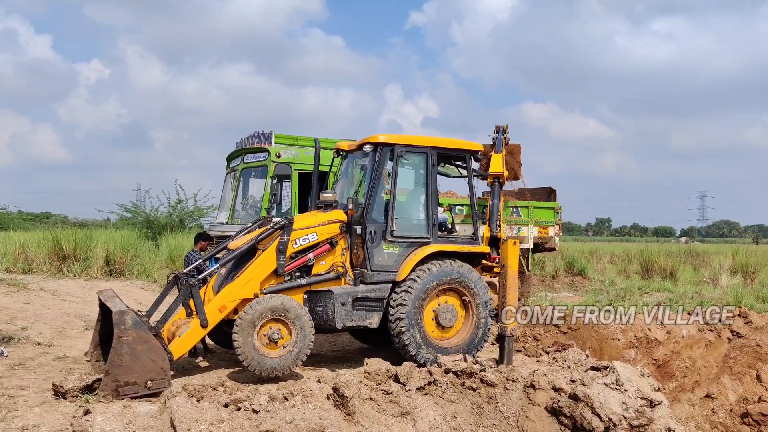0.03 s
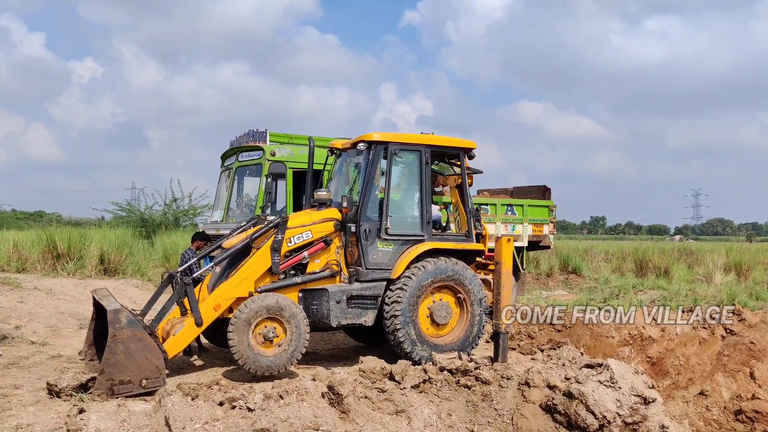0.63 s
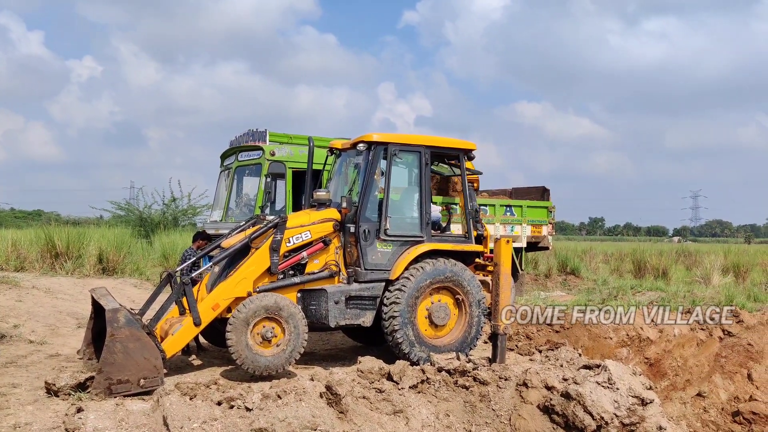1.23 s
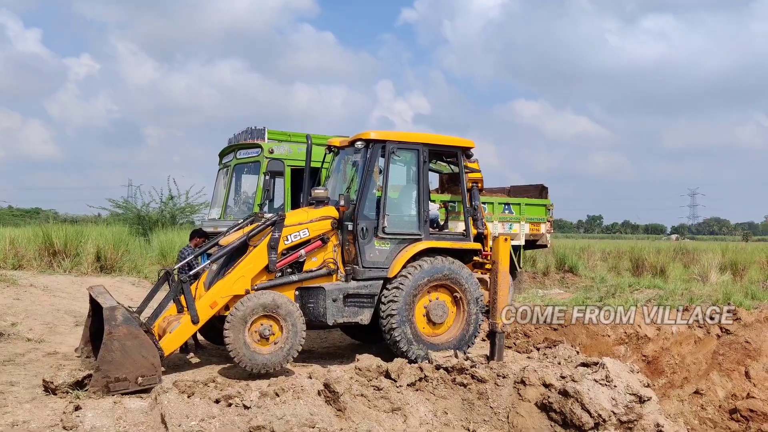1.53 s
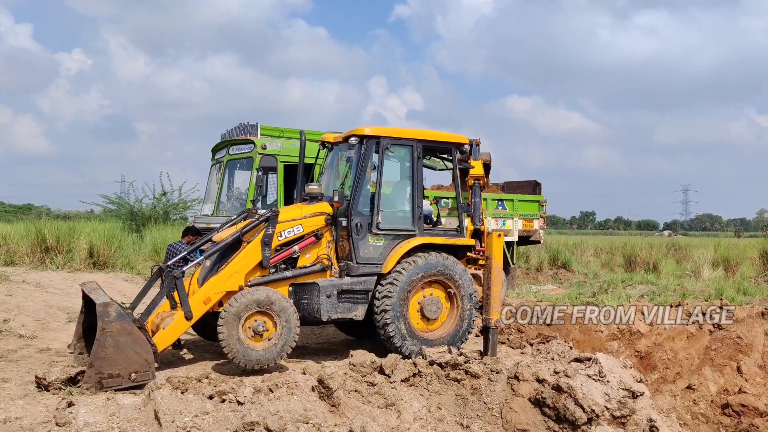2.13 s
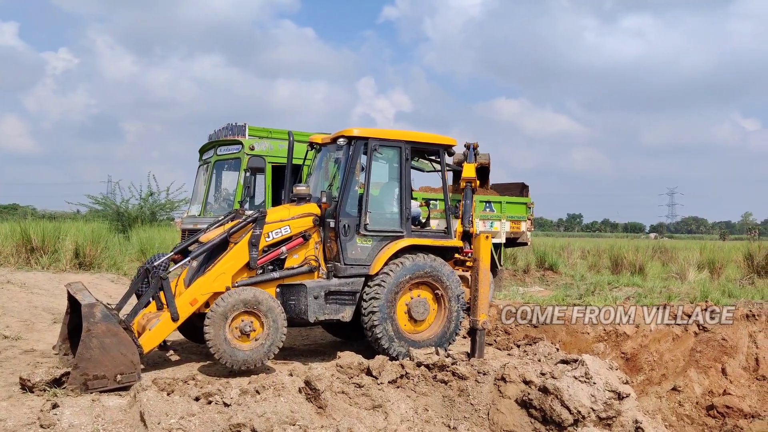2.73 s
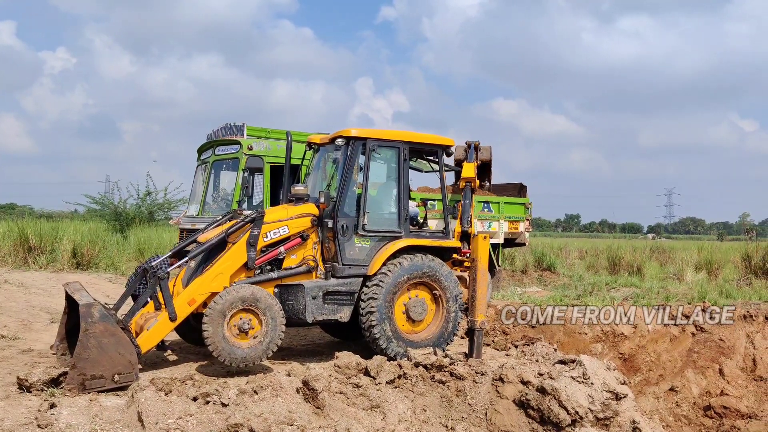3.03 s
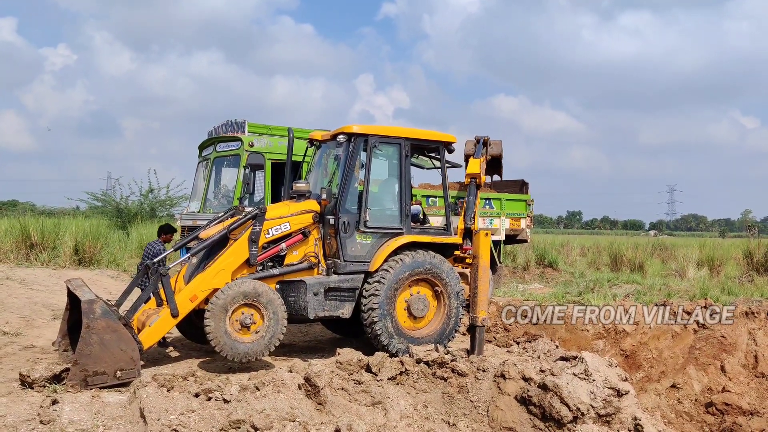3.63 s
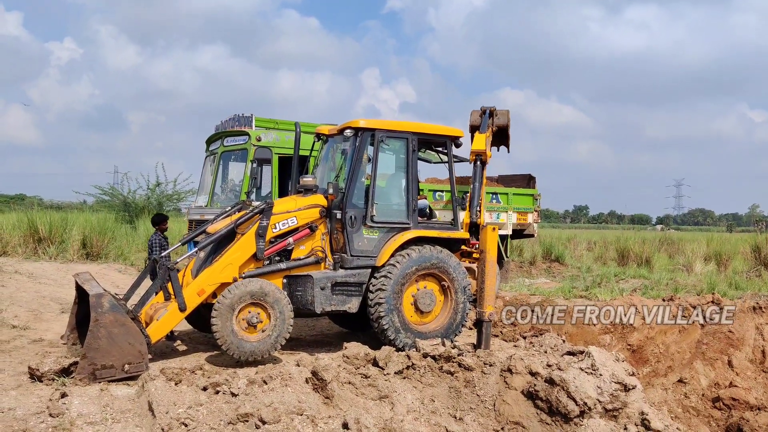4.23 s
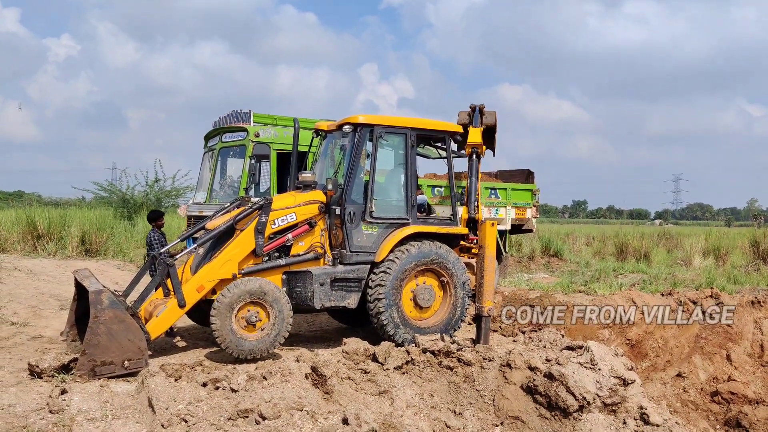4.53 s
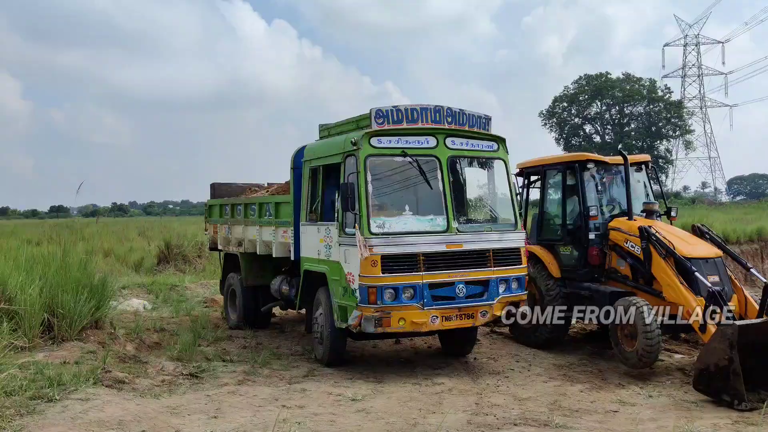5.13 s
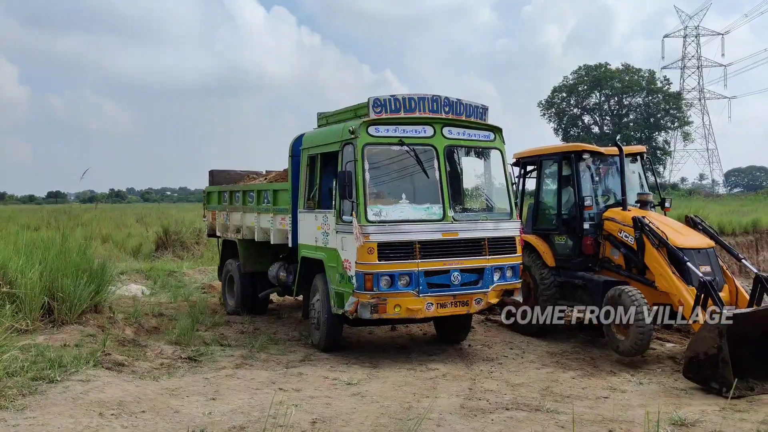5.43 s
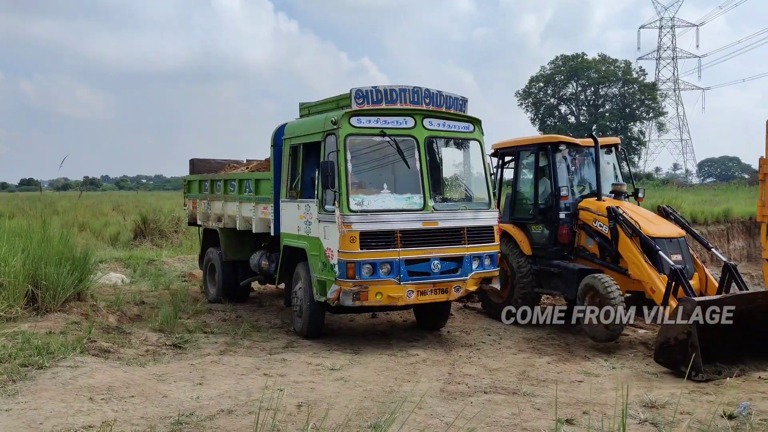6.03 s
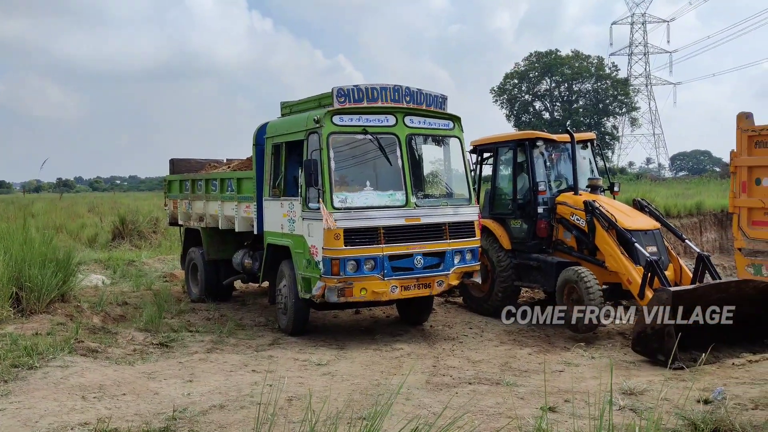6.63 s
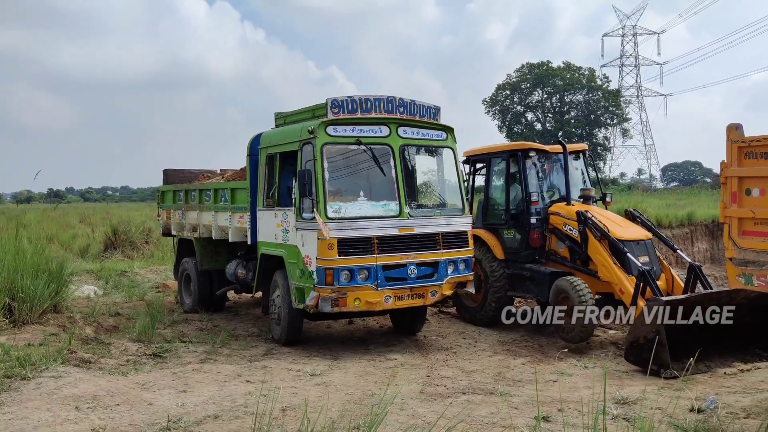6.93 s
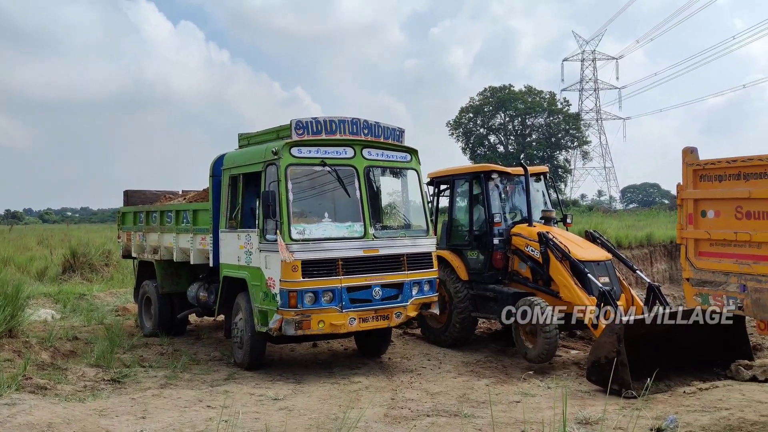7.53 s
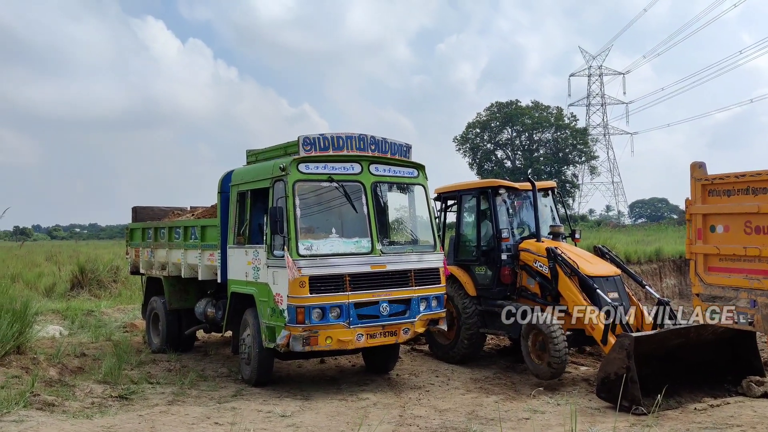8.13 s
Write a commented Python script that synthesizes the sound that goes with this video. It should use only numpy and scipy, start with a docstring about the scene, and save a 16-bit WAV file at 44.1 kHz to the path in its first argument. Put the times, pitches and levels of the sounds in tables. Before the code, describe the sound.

A backhoe's diesel engine runs at high revs in an open field, booming and knocking, its pitch dipping repeatedly under hydraulic load. Steel panels rattle, the digging arm clanks, and a pump whines over a hiss of oil and fan. After about five seconds the stereo perspective shifts from side to front, the engine winds down, air escapes briefly, and a slower, knocking idle continues. Faint wind nudges the microphone.

```python
"""Backhoe working in an open field

A four-cylinder diesel sags under each hydraulic load, then drops to idle. Firings boom in the exhaust
and knock in the block, the pump whines, oil and fan hiss, the digging arm clanks. The stereo microphone
hears it from the side, then after five seconds from the front; air escapes and wind nudges the ports."""
import sys
import numpy as np
from scipy import signal
from scipy.fft import rfft, irfft
from scipy.io import wavfile

SR = 44100
rng = np.random.default_rng(int(sys.argv[2]) if len(sys.argv) > 2 else 0)


def file_out(sig):
    """Save sig as 16-bit WAV at sys.argv[1]."""
    # one column per channel
    cols = np.atleast_2d(sig).T
    # limit, then scale
    lim = np.clip(cols, -1, 1)
    pcm = np.round(lim * 32767).astype(np.int16)
    wavfile.write(sys.argv[1], SR, pcm)


N = 365148
TIME = np.arange(N) / SR
FREQ = np.maximum(np.arange(N // 2 + 1) * SR / N, 1)
HISS_FALL = (5.18, 1)  # hiss dies down more slowly than the engine: start and length in seconds

# Strength of the four cylinders. Each entry: relative level in dB.
CYLINDERS_DB = [-3, -3.5, -3.5, -4]
# Resonances of two loose steel panels. Each row: frequency in Hz, width in Hz, relative level in dB.
LARGE_PANEL = [(350, 82, -2.5), (717, 21, -2.5), (832, 24, -4), (918.3, 34.6, 6)]
SMALL_PANEL = [(1103, 25.5, 5.5), (1212, 127, -1.5), (1340, 42, -2.5), (1894, 90, -11), (2930, 910, -23)]


def governor():
    """Firing rate in Hz and effort: each load drags the engine down, and extra fuel answers late."""
    # Hand throttle, held open, then let back. Each row: time in seconds, unloaded firing rate in Hz.
    throttle = [(0, 51.35), (4.5, 51.16), (4.97, 51.97), (5.3, 50.36), (5.42, 47.58), (5.7, 39.7),
                (5.95, 36.05), (6.42, 37.51), (7.05, 36.17), (8.28, 36.04)]
    # Hydraulic loads. Each row: time of deepest sag in seconds, sag in Hz, build-up and recovery
    # in seconds, extra fuel from 0 to 1.
    loads = [(-.03, 2.83, 0.26, .12, 0.6), (.69, 2.33, 0.37, 0.082, 0.24), (.98, 6.64, .18, .24, 0.57),
             (1.41, 4.8, .12, .24, 0.56), (1.839, 3.7, 0.13, 0.26, 0.13), (2.39, 1.57, .24, 0.098, 0),
             (2.77, 4.2, .21, .32, 0.1), (3.65, 6.1, .17, .19, 0.46), (4.23, 3.4, 0.29, 0.28, 0.1)]
    lag_s, effort_per_hz_per_s = .13, .0051
    free_hz, = curves(throttle)
    sag = sum(depth * swell(s, build, recovery) for s, depth, build, recovery, _ in loads)
    fuel = sum(extra * swell(s + lag_s, build, recovery) for s, _, build, recovery, extra in loads)
    return free_hz - sag, fuel - effort_per_hz_per_s * np.gradient(sag, TIME)


def exhaust(firings, idle):
    """Exhaust pulses: the firing tone and its octave boom; unequal cylinders add the half orders."""
    # The firing tone and its octave. Each row: time in seconds, relative level in dB.
    firing_levels = [(0, -14), (.13, -18), (.33, -17), (.7, -20), (.92, -20), (1.02, -15.5), (1.2, -17.5),
                     (1.87, -19.5), (2.2, -18), (2.55, -20), (2.78, -20.5), (3.3, -18), (3.55, -21.5),
                     (3.68, -17), (4.32, -20), (4.6, -18), (4.9, -19.7), (4.97, -25), (5.25, -23),
                     (5.33, -25), (5.62, -27), (5.85, -29), (5.98, -21), (6.5, -23.5), (8.28, -22.5)]
    octave_levels = [(0, -14.8), (.1, -15.3), (.3, -19), (.8, -20.3), (1.05, -14.9), (1.35, -17.4),
                     (1.5, -17.3), (2.2, -18.3), (2.35, -19.8), (2.7, -20.8), (3.05, -17.3), (3.42, -23.6),
                     (3.72, -14.8), (4.1, -20.2), (4.5, -18.3), (5, -26), (5.28, -27), (5.38, -23),
                     (5.88, -23), (6.3, -29.7), (8.28, -28)]
    # Weaker tones at work and at idle. Each row: multiple of the firing rate, level in dB.
    work_orders = [(.5, -45), (1.5, -38), (2.5, -39.5), (3, -36.5), (3.5, -46), (4, -46)]
    idle_orders = [(1.5, -52), (2.5, -38), (3, -34), (3.5, -48), (4, -42), (4.5, -50), (5, -53)]
    skew_rad = 3.1 * (1 - idle) + 1.75 * idle  # the silencer smears each pulse
    tone = lambda order: np.cos(2 * np.pi * order * firings + skew_rad * order * (order - 3) / 2)
    overtones = lambda orders: sum(undb(db) * tone(order) for order, db in orders)
    boom = undb(curves(firing_levels)[0]) * tone(1) + undb(curves(octave_levels)[0]) * tone(2)
    upper = overtones(work_orders) * (1 - idle) + overtones(idle_orders) * idle
    return np.sqrt(2) * (boom * undb(-.27) + upper * undb(2 * walk(10.5)))


def working(firings, gas_db, knock_db, rattle_db):
    """The engine at high speed: gas puffs, the block knocks, panels rattle as the load rises."""
    # Gas noise. Each row: frequency in Hz, relative level in dB.
    gas_spectrum = [(40, -34.5), (90, 0), (140, 6.5), (190, 3), (245, -2.5), (320, -.5), (380, -2),
                    (435, -18), (600, -21), (1500, -30.5), (8000, -76)]
    # Block resonances. Each row: frequency in Hz, width in Hz, relative level in dB.
    block_modes = [(486, 62, -2.5), (555.7, 44, 3.5), (570, 190, -7), (768, 190, -3.5), (1453, 96, -8.5),
                   (2080, 460, -19.5), (3160, 710, -27.5)]
    # Panels buzz as the engine labours. Each row: peak in seconds, level in dB, half length in seconds.
    buzzes = [(0.059, -35.5, 0.074), (1.197, -38, 0.2), (1.6, -38.5, .14), (2.02, -39.5, 0.21),
              (2.997, -44, 0.24), (3.79, -35.5, 0.063), (4.45, -44, 0.19)]
    gas = colour(clatter(firings, 2, .0002, .5) * gate(firings, .15, .45, .6), gas_spectrum)
    block = ring(clatter(firings, 3.2, .00005, .37) * gate(firings, .7, .31, .43), block_modes)
    shake = clatter(firings, 2.7, .00003, .39) * gate(firings, .7, .45, .5)
    buzz = sum(undb(db) * swell(s, half, half) for s, db, half in buzzes)
    rattle_gain = np.hypot(undb(rattle_db), buzz) * undb(1.3 * walk(10.5))
    panels = ring(shake, LARGE_PANEL + SMALL_PANEL) * rattle_gain
    return gas * undb(gas_db + 7.5) + block * undb(knock_db + 2.5) + panels


def idling(firings, gas_db, knock_db):
    """The engine at idle: a slower throb with uneven knocks; the timing gears sing faintly."""
    # Gas noise. Each row: frequency in Hz, relative level in dB.
    gas_spectrum = [(40, -28), (90, 6), (150, 10), (200, 3), (260, 3), (330, -7), (400, -5.5), (480, -12),
                    (650, 2.5), (1500, -38), (8000, -87)]
    # Block resonances. Each row: frequency in Hz, width in Hz, relative level in dB.
    block_modes = [(520, 69, -1), (640, 36, 2), (822, 102, 0), (1146, 250, -2.5), (1375, 140, -5.5),
                   (1595, 150, -1.5), (2160, 300, -6.5), (2810, 140, -10), (3280, 760, -20)]
    # Hard knocks. Each row: time in seconds, level in dB against a firing, rise and decay in seconds.
    knocks = [(5.828, -2, .001, .005), (7.027, -8, .001, .005), (7.251, -4, .001, .005),
              (7.363, -3, .001, .005), (8.115, -2, .001, .005), (8.225, -3, .001, .005)]
    gas = colour(clatter(firings, 2, .0003, .7) * gate(firings, .1, .45, 1.1), gas_spectrum)
    blows = gate(firings, .5, .27, .45) * undb(.5 * walk(25)) + bursts(knocks)
    block = ring(clatter(firings, 1.1, .00006, .9) * blows, block_modes)
    gears = np.sin(2 * np.pi * 18 * firings) * undb(-52 + 1.8 * walk(2.6))
    return gas * undb(gas_db + 12) + block * undb(knock_db + .6) + gears


def panel_bangs():
    """Both loose panels bang at each jerk of the arm, in changing proportion."""
    # Each row: time in seconds, level of the large panel in dB, level of the small panel in dB.
    jerks = [(.004, -38, -31), (.068, -37, -34), (.098, -30, -31.5), (.972, -36, -39), (1.089, -27.5, -30),
             (1.134, -36, -31.5), (1.18, -34, -33), (1.215, -37, -34), (1.263, -35, -34), (1.334, -34, -31),
             (1.409, -41, -34), (1.482, -34, -39), (1.513, -29, -35), (1.643, -30.5, -43),
             (1.674, -34.5, -45), (1.708, -31, -32), (1.93, -45, -35), (2.08, -35, -45), (2.732, -38, -40),
             (2.896, -33, -45), (2.988, -33, -43), (3.065, -35, -40), (3.674, -42, -35), (3.719, -32, -38),
             (3.762, -43, -31.5), (3.805, -30.5, -32), (3.891, -38, -35), (4.459, -33, -41)]
    large = place(bang(LARGE_PANEL, s, db) for s, db, _ in jerks)
    small = place(bang(SMALL_PANEL, s, db) for s, _, db in jerks)
    return large + small


def arm():
    """The digging arm clanks and rebounds in its joints, and a pivot pin ticks."""
    # Resonances of arm and pin. Each row: frequency in Hz, width in Hz, relative level in dB.
    arm_modes = [(315, 130, 0), (705, 70, 2), (930, 160, 0), (1135, 60, 4), (1360, 160, 2), (1630, 80, -1),
                 (1880, 200, -2), (2200, 400, -6), (2590, 70, -6), (3100, 600, -11), (3580, 60, -9),
                 (4100, 400, -11), (4680, 130, -8), (5540, 300, -14), (6800, 700, -15)]
    pin_modes = [(1857, 50, -4), (3079, 70, -4), (3500, 200, -10), (4050, 45, 1), (4210, 45, 0),
                 (5733, 60, -7), (7700, 200, -16)]
    # Each row: time in seconds, level in dB, chatter time in seconds, treble cutoff in Hz.
    clanks = [(.376, -32.5, .002, 800), (.432, -35, .003, 900), (1.318, -29, .007, 1900),
              (1.336, -23, .003, 7000), (1.35, -26.5, .005, 7000), (1.368, -33.5, .006, 7000),
              (1.616, -37, .005, 3500), (1.715, -28.5, .006, 2400), (1.73, -33, .005, 2600)]
    # Each row: time in seconds, level in dB.
    ticks = [(.329, -39.5), (.343, -45), (.37, -46)]
    joints = place(bang(arm_modes, *clank) for clank in clanks)
    return joints + place(bang(pin_modes, s, db, contact_s=.003) for s, db in ticks)


def pump(firings, hz, idle, front, order=6):
    """The gear pump's ripple and rough octave, locked to the crank, swell with each valve stroke."""
    # Strokes. Each row: peak in seconds, whine in dB, octave in dB, half length in seconds.
    strokes = [(0.194, -50, -55, 0.043), (0.913, -38, -55, 0.034), (1.918, -34.5, -58, 0.039),
               (3.27, -58, -39, .11), (3.527, -34.5, -57, 0.1), (4.029, -38.5, -52, 0.12),
               (5.779, -47, -54, 0.096)]
    line_hz, line_width_hz = 215, 6.6  # an oil line hums when the ripple meets its resonance at idle
    whine = undb(-49) + undb(-37) / (1 + ((order * hz - line_hz) / line_width_hz) ** 4)
    # From the front the octave stands out until the throttle closes.
    octave = undb(-58) + undb(-42) * front * (1 - ramp(5.27, .25))
    for s, whine_db, octave_db, half in strokes:
        stroke = swell(s, half, half)
        whine += undb(whine_db) * stroke
        octave += undb(octave_db) * stroke
    phase = 2 * np.pi * order * firings + .16 * walk(30)
    whine *= undb(walk(18))
    octave *= undb(3.3 * walk(35))
    return np.sqrt(2) * (whine * np.sin(phase) + octave * np.sin(2 * phase))


def valve(effort, front, slowed):
    """Oil forced through a valve sings in a narrow band, louder under load."""
    # Louder spells. Each row: peak in seconds, relative level in dB, half length in seconds.
    spells = [(1.133, -52, 0.2), (3.745, -50, 0.14), (5.3, -65.5, 0.25), (6.003, -52.5, 0.14),
              (6.45, -54, 0.21)]
    side_hz, front_hz, idle_hz = 2550, 2640, 2520
    gain = undb(loudness(effort, slowed, free_db=-52, effort_db=4, idle_db=-59.5))
    gain += sum(undb(db) * swell(s, half, half) for s, db, half in spells)
    hz = (side_hz * (1 - front) + front_hz * front) * (1 - slowed) + idle_hz * slowed
    return (band(hz, 150) + .57 * band(hz, 550)) * gain * undb(-1 + 1.5 * walk(12))


def hiss(firings, effort, front):
    """Oil, fan and injector hiss pulses with the firings; duller from the front, where tubes ring."""
    # Hiss at the two microphone positions. Each row: frequency in Hz, relative level in dB.
    side_spectrum = [(500, 8.5), (1500, 7), (3000, 6.5), (3900, 4), (4900, 1), (5750, 3), (6300, -0.5),
                     (6950, 0.5), (7900, -1.5), (9400, -1), (10400, -4), (12200, -4), (13600, 0),
                     (15500, -13)]
    front_spectrum = [(500, 13.5), (1500, 11.5), (3000, 3), (4000, 3.5), (5000, 0), (6900, 0.5), (7700, -3),
                      (9500, -7), (12000, -7), (15500, -11.5)]
    # Tube resonances at idle. Each row: frequency in Hz, width in Hz, relative level in dB.
    tube_modes = [(2850, 70, 9), (3380, 90, 9.5), (4100, 120, -1), (4700, 250, -7), (6300, 120, -10),
                  (7000, 160, -13)]
    slowed = ramp(*HISS_FALL)
    hiss_db = loudness(effort, slowed, free_db=-46, effort_db=2, idle_db=-54.5)
    hiss_db -= 4 * front * (1 - slowed)
    sing = valve(effort, front, slowed)
    spray = clatter(firings, 6.4, .0002, 3.2) * gate(firings, .4, .27, .94)
    side = colour(spray, side_spectrum) * undb(hiss_db + 5) + sing
    ringing = undb(-10) * ramp(6, 1.29) * ring(noises(), tube_modes)
    ahead = (colour(spray, front_spectrum) + ringing) * undb(hiss_db + 9) + sing
    from_side = ports(side * (1 - front), lag_ms=.084, scatter_hz=1380, scatter=.57, pan_db=-.5)
    return from_side + ports(ahead * front, lag_ms=-.07, scatter_hz=1800, scatter=.77)


def tubes(firings, effort):
    """Thin steel tubes rasp in their clamps at high engine speed, each wavering on its own."""
    # Each row: frequency in Hz, width in Hz, relative level in dB.
    tube_modes = [(4060, 200, -4), (4690, 230, -2.5), (5740, 170, -2), (6280, 330, -1), (6930, 310, 1.5),
                  (7450, 300, -5), (8950, 320, -3.5), (9680, 300, -4)]
    wander, flicker_db = .005, 1.7
    rasp = sum(band(hz * (1 + wander * walk(9)), width) * undb(db + flicker_db * walk(9.2))
               for hz, width, db in tube_modes)
    shake = unit(gate(firings, .44, .18, 1)) * (1 - ramp(*HISS_FALL)) ** 2
    return ports(rasp * shake * undb(-59 + 1.3 * effort), lag_ms=.059, scatter=.86, pan_db=-1.5)


def air():
    """Air escapes in one long puff and a few short spits."""
    # Each row: frequency in Hz, relative level in dB.
    spectrum = [(2000, -17), (4500, 2), (7000, 7.5), (9000, 6), (11000, -1), (13000, 9), (15500, 0)]
    # Each row: peak in seconds, level in dB, rise and decay in seconds.
    puffs = [(5.607, -45, 0.0019, 0.0054), (5.62, -42, 0.00088, 0.0032), (5.69, -44.5, 0.085, 0.13),
             (5.787, -44, 0.00096, 0.0026), (5.812, -42, 0.00098, 0.0028), (5.948, -42, 0.00099, .003)]
    return colour(noises(), spectrum) * bursts(puffs)


def wind():
    """Low eddies on the microphone ports, partly shared between the two."""
    # Each row: frequency in Hz, relative level in dB.
    spectrum = [(10, 1), (22, 3), (50, -3), (90, -9), (160, -19), (400, -45), (3000, -110)]
    # Each row: peak in seconds, relative level in dB, rise and decay in seconds.
    buffets = [(.89, -18.5, .01, .03), (1.3, -27, .04, .05), (4.15, -28, .03, .05), (4.95, -28, .02, .03),
               (5.1, -28, .015, .02), (5.25, -24, .03, .035), (5.89, -30, .03, .08), (7.74, -27, .04, .05)]
    shared, *own = colour(noises(), spectrum)
    return (.4 * shared + 1.05 * np.array(own)) * (bursts(buffets) + undb(-34.5))


def strikes(firings, scatter_db, jitter_s, count=96):
    """Pistons, valves and gears strike at the same crank angles every cycle, never quite alike."""
    cycles = firings / len(CYLINDERS_DB)
    angles = (np.arange(count * 2)[:, None] + rng.random(count)).ravel()
    chance = rng.standard_normal((len(angles), 2))
    size = np.tile(rng.choice([-1, 1], count), count * 2) * undb(scatter_db * chance[:, 0])
    at = (np.interp(angles, cycles, TIME, right=-1) + jitter_s * chance[:, 1]) * SR
    inside = (at > 0) & (at < N - 1)
    return unit(np.bincount(at[inside].astype(int), size[inside], N))


def clatter(firings, scatter_db, jitter_s, turbulence):
    """Repeating strikes and loose turbulence on each path."""
    return np.array([strikes(firings, scatter_db, jitter_s) + turbulence * path for path in noises()])


def gate(firings, start, length, floor):
    """A surge once a firing, as strong as its cylinder; start and length are shares of a firing."""
    age = firings - start
    cylinder = np.floor(age).astype(int) % len(CYLINDERS_DB)
    return undb(CYLINDERS_DB)[cylinder] * np.exp(-(age % 1) / length) + floor


def bang(modes, s, db, contact_s=.007, top_hz=15000, size=6000):
    """Steel chatters against its stop and rings; db is its energy as a level over 20 ms."""
    age = TIME[:size]
    ringing = sum(undb(peak_db) * width * np.exp(-np.pi * width * age)
                  * np.sin(2 * np.pi * hz * rng.normal(1, .008) * age) for hz, width, peak_db in modes)
    softness = signal.butter(2, top_hz, fs=SR, output="sos")
    contact = signal.sosfilt(softness, rng.standard_normal((3, size))) * age * np.exp(-age / contact_s)
    sound = signal.fftconvolve(contact, ringing[None], axes=1)[:, :size]
    sound *= undb(db) / np.sqrt(np.sum(sound ** 2, axis=1, keepdims=True) / (.02 * SR))
    return int(max(s - contact_s, 0) * SR), sound


def place(blows):
    """Lay (first sample, sound) blows on the three paths."""
    out = np.zeros((3, N))
    for at, sound in blows:
        out[:, at:at + sound.shape[1]] += sound
    return out


def ports(paths, lag_ms, scatter_hz=1500, scatter=.43, pan_db=0):
    """Two microphone ports: shared sound reaches one first; in the treble each hears its own mix."""
    treble = 1 / (1 + (scatter_hz / FREQ) ** 2)
    own_share = np.clip(scatter, .05, 1) * treble
    turn = np.pi * FREQ * lag_ms / 1000
    spectra = rfft(paths)
    shared = np.sqrt(1 - own_share) * np.exp(1j * np.outer([1, -1], turn)) * spectra[0]
    own = np.sqrt(own_share) * spectra[1:]
    balance = undb(np.outer([.5, -.5], pan_db * treble))
    mono_gain = np.sqrt((1 - own_share) * np.cos(turn) ** 2 + own_share / 2)
    return irfft((shared + own) * balance / mono_gain, N)


def noises():
    """White noise on three paths: shared by both ports, left alone, right alone."""
    return rng.standard_normal((3, N))


def band(hz, width, size=16384):
    """Narrow noise on three paths around a centre that may move."""
    points = rng.standard_normal((3, size, 2)) @ np.array([1, 1j])
    slow = np.array([np.interp(TIME * width * np.pi / 2, np.arange(size), path) for path in points])
    return unit(np.real(slow * np.exp(2j * np.pi * np.cumsum(hz) / SR)))


def walk(rate_hz):
    """Smooth random wander of spread 1."""
    return unit(irfft(rfft(rng.standard_normal(N)) / (1 + (FREQ / rate_hz) ** 4), N))


def shape(x, gain):
    """Causal filter, scaled to rms 1: it rings after a blow, never before."""
    cepstrum = irfft(np.log(gain + 1e-6), N)
    cepstrum[1:N // 2] *= 2
    cepstrum[N // 2 + 1:] = 0
    return unit(irfft(rfft(x) * np.exp(rfft(cepstrum)), N))


def colour(x, spectrum):
    """Filter by (Hz, dB) points."""
    hz, db = np.transpose(spectrum)
    return shape(x, undb(np.interp(np.log(FREQ), np.log(hz), db)))


def ring(x, modes):
    """Pass through resonances with steep skirts."""
    power = sum((undb(db) / (1 + ((FREQ ** 2 - hz ** 2) / (FREQ * width)) ** 2 / 2)) ** 2
                for hz, width, db in modes)
    return shape(x, np.sqrt(power))


def loudness(effort, idle, free_db, effort_db, idle_db):
    """Relative level of a layer in dB: it rises with effort and settles at idle."""
    return (free_db + effort_db * effort) * (1 - idle) + idle_db * idle


def bursts(table):
    """Envelope of events that swell quickly and die away."""
    return sum(undb(db) * np.exp(-np.where(TIME < s, ((TIME - s) / rise) ** 2, (TIME - s) / decay))
               for s, db, rise, decay in table)


def swell(s, before, after):
    """A smooth hump that peaks at s."""
    return np.exp(-((TIME - s) / np.where(TIME < s, before, after)) ** 2)


def ramp(start, length):
    """Rises from 0 to 1 over length seconds."""
    return np.clip((TIME - start) / length, 0, 1)


def curves(table):
    """Each column of a timed table, sample by sample."""
    s, *columns = np.transpose(table)
    return [np.interp(TIME, s, column) for column in columns]


def undb(db):
    """Decibels to gain."""
    return 10 ** (np.asarray(db) / 20)


def unit(x):
    """Scale to rms 1."""
    return x / np.sqrt(np.mean(x ** 2))


def scene():
    """The backhoe at the microphone, first from the side, then from the front as it winds down."""
    hz, effort = governor()
    firings = np.cumsum(hz) / SR
    front = ramp(4.955, .0075)
    idle = ramp(5.136, .63)
    gas_db = loudness(effort, idle, free_db=-38.5, effort_db=4, idle_db=-48)
    knock_db = loudness(effort, idle, free_db=-37.5, effort_db=1, idle_db=-40.5)
    panel_effort = np.interp(TIME - .03, TIME, effort)  # the panels follow 30 ms later
    rattle_db = loudness(panel_effort, idle, free_db=-40.5, effort_db=3.5, idle_db=-58) - 1.5 * front
    fast = working(firings, gas_db, knock_db, rattle_db) * undb(-1.5 * front)
    engine = fast * np.sqrt(1 - idle) + idling(firings, gas_db, knock_db) * np.sqrt(idle)
    out = ports(engine * (1 - front) + panel_bangs(), lag_ms=.045, scatter_hz=1280, scatter=.9)
    out += ports(engine * front, lag_ms=-.029, scatter=.41, pan_db=3)
    out += exhaust(firings, idle) + pump(firings, hz, idle, front)
    out += hiss(firings, effort, front) + tubes(firings, effort)
    out += ports(arm(), lag_ms=-.033)
    out += ports(air(), lag_ms=0)
    return out + wind()


def record(dry):
    """The recorder cuts the deepest rumble and the top."""
    low_hz, top_hz = 8, 15400
    x = signal.sosfilt(signal.butter(1, low_hz, "high", fs=SR, output="sos"), dry * ramp(0, .003))
    return signal.sosfilt(signal.ellip(10, .2, 80, top_hz, fs=SR, output="sos"), x)


dry = scene()
out = record(dry)
file_out(out)
```